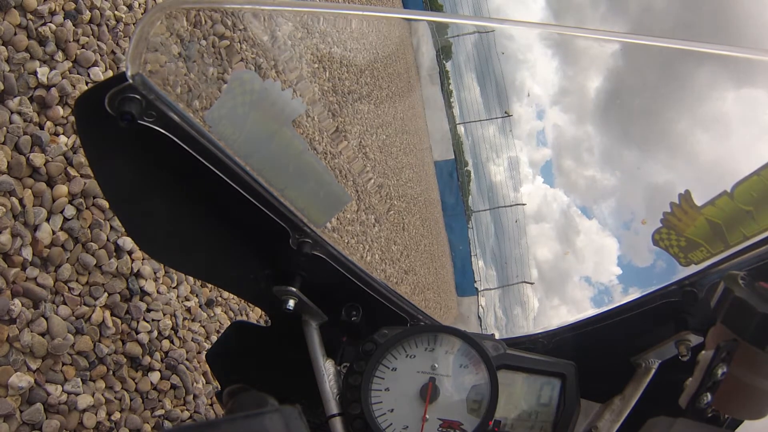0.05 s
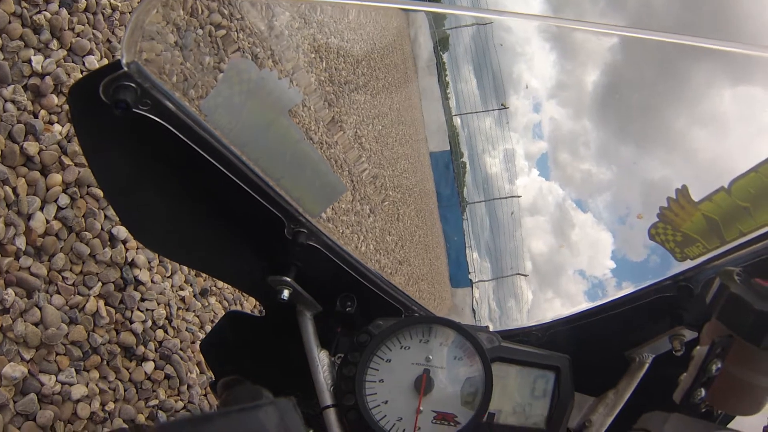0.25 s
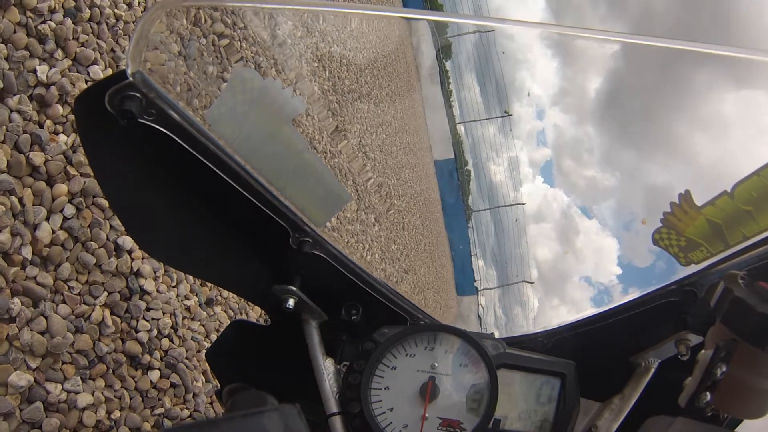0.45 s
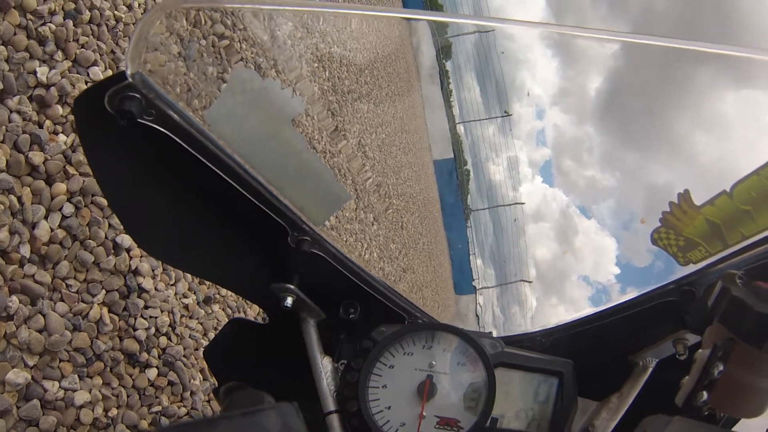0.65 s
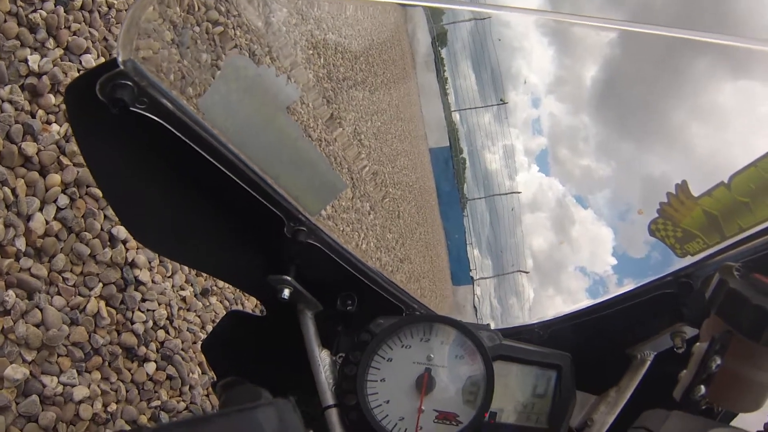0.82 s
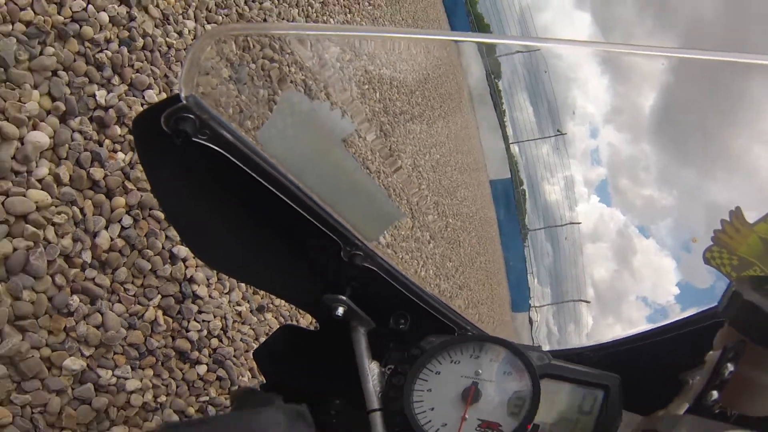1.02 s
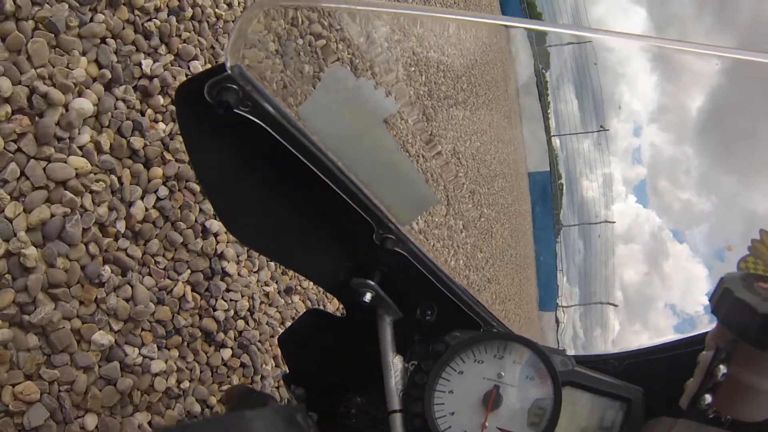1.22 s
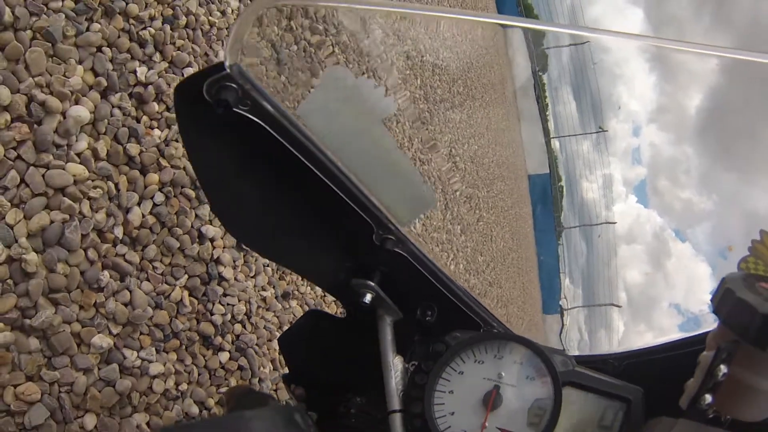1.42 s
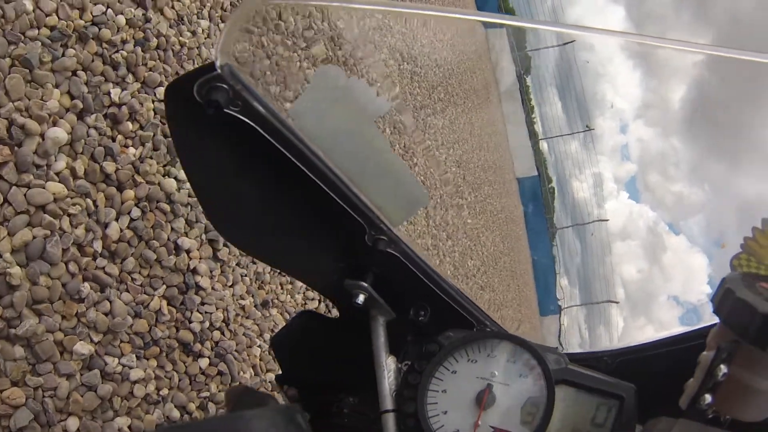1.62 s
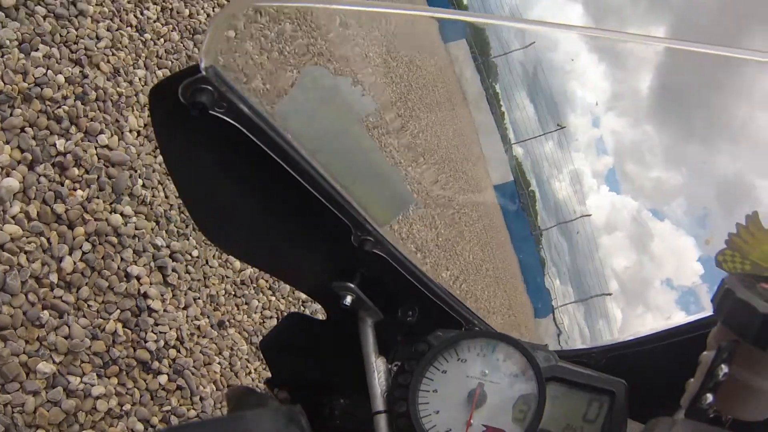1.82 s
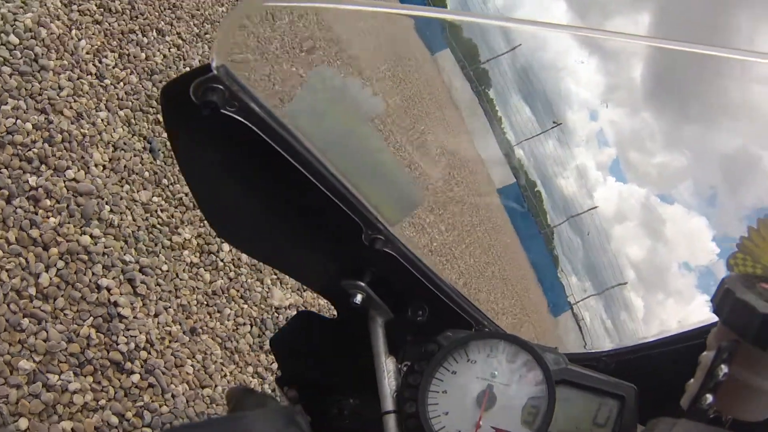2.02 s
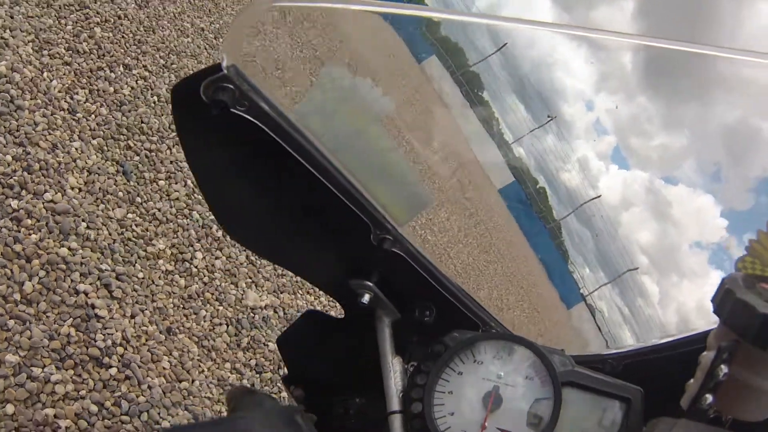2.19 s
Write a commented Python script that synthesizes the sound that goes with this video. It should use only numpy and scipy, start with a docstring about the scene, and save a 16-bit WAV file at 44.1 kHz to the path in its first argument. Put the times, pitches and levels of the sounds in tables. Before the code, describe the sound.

Heard up close from the bike itself, a toppled motorcycle's plastic bodywork scrapes twice over gravel, with dry knocks and heavy thumps. Afterwards loose stones tick and crunch softly above a low, wavering drone and faint outdoor wind.

```python
"""A fallen motorcycle is shifted on gravel, heard from on the bike, in a little wind. Two stones tick
faintly; at 0.2 s the plastic shell knocks, squeaks and scrapes as tiny slips make it ring, and the heavy
frame thumps and sways. From 0.6 s comes a second, broken scrape with more knocks and thumps. From about
1.25 s loose stones crunch and tick faintly over a low, wavering drone."""
import sys
import numpy as np
from scipy.fft import rfft, irfft, next_fast_len
from scipy.io import wavfile
from scipy.ndimage import map_coordinates

SR = 44100
rng = np.random.default_rng(int(sys.argv[2]) if len(sys.argv) > 2 else 0)


def dump(signal):
    """Clip the signal to [-1, 1] and save it as 16-bit WAV at the path in sys.argv[1]."""
    limited = np.clip(np.atleast_2d(signal).T, -1, 1)
    pcm = np.round(limited * 32767).astype(np.int16)
    wavfile.write(sys.argv[1], SR, pcm)


N = 103635
TIME = np.arange(N) / SR


def amp(db):
    """Turn decibels into a gain to multiply by."""
    return 10 ** (np.asarray(db) / 20)


def unit(x):
    """Scale a sound to an average power of 1."""
    return x / np.sqrt(np.mean(x ** 2) + 1e-20)


def along(points, hz):
    """Read the gain at hz off a colour: a table of how strong low and high pitches are."""
    freqs, db = np.transpose(points)
    return amp(np.interp(np.log(hz + 1), np.log(freqs + 1), db))


def level(rows, column=1):
    """Join a table's levels into a gain over time, silent before the first row."""
    rows = np.array(rows)
    return amp(np.interp(TIME, rows[:, 0], rows[:, column], left=-120))


def wobble(rate):
    """A smooth curve through rate random values a second."""
    return map_coordinates(rng.standard_normal(2048), [np.arange(N) * rate / SR], mode="wrap")


def coloured(x, gain):
    """Filter x by gain(hz), so that ringing follows each hit and never comes before it."""
    size = 2 * next_fast_len(len(x) + 4096)
    gains = np.maximum(gain(np.fft.rfftfreq(size, 1 / SR)), 1e-6)
    cepstrum = irfft(np.log(gains))
    cepstrum[1:size // 2] *= 2
    cepstrum[size // 2 + 1:] = 0
    return irfft(rfft(x, size) * np.exp(rfft(cepstrum)))[:len(x)]


def noise(colour):
    """Steady noise of the given colour."""
    return unit(coloured(rng.standard_normal(N), lambda hz: along(colour, hz)))


def add(track, start_s, sound):
    """Mix a sound into the track."""
    part = track[int(start_s * SR):][:len(sound)]
    part += sound[:len(part)]


def grit(rate, spread_db, hiss):
    """Tiny random slips of uneven size, about rate a second, over a hiss."""
    slips = (rng.random(N) < rate / SR) * np.sign(rng.standard_normal(N))
    sizes = amp(spread_db * np.clip(rng.standard_normal(N), -2, 2))
    return unit(unit(slips * sizes) + hiss * rng.standard_normal(N))


def contact(fade_s, rattle):
    """One sharp click, then tiny rattles that drop 60 dB in fade_s."""
    t = np.arange(4096) / SR
    burst = rng.standard_normal(len(t)) * amp(-60 * t / fade_s)
    burst *= rattle / np.linalg.norm(burst)
    burst[0] = 1
    return burst / np.linalg.norm(burst)


# pitches at which the plastic shell rings: f/Hz, width/Hz, level/dB
SHELL_RINGS = [(1374, 75, 11), (1574, 81, 3.5), (2140, 190, 3), (2890, 26, 11), (2956, 150, 12),
               (3520, 30, 11.5), (3762, 140, 10.5), (5320, 52, 0.5), (7040, 110, -0.5), (7960, 57, 3)]

def shell(hz, ring, modes=SHELL_RINGS):
    """The shell boosts sound near its own pitches; a larger ring boosts it more."""
    peaks = sum(amp(db) ** 2 / (1 + (2 * (hz - centre) / width) ** 2) for centre, width, db in modes)
    return np.sqrt(1 + peaks) ** ring


# colour of the wind: f/Hz, relative level/dB
WIND_COLOUR = [(25, 4), (75, -6.5), (120, -2.5), (600, -13.5), (3350, -27), (15000, -40.5)]

def air():
    """Faint wind and far rumble."""
    return amp(-62 + wobble(0.8)) * noise(WIND_COLOUR)


# loudness of the drone: t/s, throb level/dB, hum level/dB
DRONE_LEVELS = [(1.235, -36, -43), (1.33, -25.5, -35.5), (1.41, -36.5, -40.5), (1.49, -30, -66),
                (1.58, -40, -41.5), (1.73, -30, -50), (1.83, -34.5, -31), (1.91, -21.5, -36),
                (1.98, -35.5, -38.5), (2.05, -24.5, -48), (2.15, -37, -49.5), (2.3, -39.5, -36)]
# its higher tones: f/Hz, level/dB
DRONE_TONES = [(192, -67), (260, -58), (306, -60.5), (366, -61), (440, -64)]

def drone():
    """A wavering low throb and hum, with weak higher tones of steadier pitch."""
    def tone(hz, waver, flutter_db):
        pitch = hz * (1 + waver * wobble(12))
        return unit(np.sin(2 * np.pi * np.cumsum(pitch) / SR) * amp(flutter_db * wobble(21.73)))
    upper = sum(amp(db) * tone(hz, waver=0.00654, flutter_db=4.0) for hz, db in DRONE_TONES)
    throb = level(DRONE_LEVELS) * tone(hz=32.5, waver=0.067, flutter_db=-0.5)
    hum = level(DRONE_LEVELS, column=2) * tone(hz=119.3, waver=0.023, flutter_db=1.5)
    return throb + hum + upper * (TIME > DRONE_LEVELS[0][0])


# loudness of the crunch: t/s, relative level/dB
CRUNCH_LEVELS = [(1.25, -46), (1.45, -52.5), (1.54, -48.5), (1.6, -51), (1.635, -44), (1.665, -46),
                 (1.705, -46), (1.76, -48.5), (1.93, -49), (2.02, -54), (2.35, -54)]
# its colour: f/Hz, relative level/dB
CRUNCH_COLOUR = [(200, 12.5), (480, -5.5), (800, -6), (990, 1.5), (1170, -7.5), (1600, -4), (2450, -6.5),
                 (3000, -23), (3750, -16.5), (4250, -31), (4600, -19.5), (5150, -36), (6000, -22.5),
                 (9000, -49.5)]
# single stones: t/s, relative level/dB, f/Hz
STONE_TICKS = [(0.029, -41.5, 1340), (0.134, -37.5, 1610), (1.304, -28, 2500), (1.691, -23, 1400),
               (1.714, -24, 1390), (1.769, -38.5, 3500), (1.867, -33.5, 4100), (1.923, -27, 2270),
               (1.953, -28.5, 2360), (1.96, -35.5, 5250), (1.975, -23, 1830), (2.116, -25.5, 1480),
               (2.135, -34, 1040), (2.295, -34.5, 2400)]

def gravel():
    """Loose stones crunch in soft lumps; single ones tick, each around its own pitch."""
    slips = grit(rate=290, spread_db=1.0, hiss=1.0)
    crunch = unit(coloured(slips, lambda hz: along(CRUNCH_COLOUR, hz) * shell(hz, ring=0.33)))
    lumps = amp(4.5 + 2.6 * wobble(45.47))
    out = level(CRUNCH_LEVELS) * lumps * crunch
    for start, db, centre in STONE_TICKS:
        click = contact(fade_s=0.043, rattle=2.6)
        tick = coloured(click, lambda hz: (1 + 1.65 * np.log2((hz + 1) / centre) ** 2) ** -2)
        add(out, start, amp(db + 6.5) * tick / np.linalg.norm(tick))
    return out


# jolts of the frame: t/s, relative level/dB, f/Hz, fade time/s, relative ring level/dB
FRAME_THUMPS = [(.201, -14.5, 64, 0.087, -31), (0.223, -12.5, 39.6, 0.17, -20), (.631, -25.5, 25.7, 1, -45),
                (0.705, -16, 24.3, 0.36, -50), (0.823, -8, 76.8, 0.011, -34.5),
                (.961, -6.5, 56, 0.032, -32.5), (1.066, -12.5, 100, 0.089, -38.5),
                (1.144, -3.5, 33, 0.091, -31), (1.2151, 2.5, 124, 0.0093, -30.5)]
# hollow ring of the shell: f/Hz, relative level/dB, fade time/s
HOLLOW_RING = [(128, -2.5, 0.35), (189.4, -6, .24), (312, -16, 0.053)]
# loudness of the slow heaving: t/s, level/dB
HEAVE_LEVELS = [(.195, -45), (.21, -15.5), (.29, -21.5), (.48, -31), (.6, -35), (.9, -26.5), (1.08, -34),
                (1.14, -16), (1.23, -28.5), (1.3, -28.5), (1.45, -64), (1.75, -50), (1.9, -30.5),
                (2.0, -51), (2.35, -42.5)]
# its colour: f/Hz, relative level/dB
HEAVE_COLOUR = [(10, -2), (25, 12.5), (45, -6.5), (80, -8.5), (190, -24.5), (300, -32), (600, -47),
                (1500, -105)]

def frame():
    """The heavy frame thumps at each jolt, rings the hollow shell and heaves in between."""
    out, t = np.zeros(N), np.arange(SR // 2) / SR
    def fading_tone(hz, db, fade_s):
        return amp(db - 60 * t / fade_s) * np.sin(2 * np.pi * hz * t)
    ring = sum(fading_tone(*row) for row in HOLLOW_RING)
    onset = 1 - np.exp(-t / 0.00042)
    for start, db, hz, fade_s, ring_db in FRAME_THUMPS:
        thump = fading_tone(hz, db, fade_s) + amp(ring_db) * ring
        add(out, start, np.sqrt(2) * thump * onset)
    return out + level(HEAVE_LEVELS) * noise(HEAVE_COLOUR)


def squeak(peak_s=0.2245, width_s=0.0041, hz=1375, db=-13.5):
    """As the scrape takes hold, the shell briefly sticks and slips in step with its own ringing."""
    t = TIME - peak_s
    swell = amp(db) * np.exp(-(t / width_s) ** 2)
    return swell * np.sin(2 * np.pi * hz * t + 0.24 * wobble(500))


# loudness of the long drag, the later broken rub and the high crackle: t/s, level/dB
DRAG_LEVELS = [(.1995, -30), (.217, -35), (.228, -23), (.285, -27.5), (.35, -30.5), (.42, -26), (.49, -36),
               (.54, -44), (.60, -44), (.622, -55.5), (.66, -69)]
RUB_LEVELS = [(.645, -54.5), (.705, -62.5), (.73, -44.5), (.755, -40.5), (.80, -59), (.825, -44.5),
              (.896, -61.5), (.955, -55.5), (.968, -42), (1.085, -39.5), (1.132, -27), (1.152, -39),
              (1.19, -33), (1.252, -43), (1.263, -34), (1.305, -43), (1.38, -74)]
CRACKLE_LEVELS = [(.1995, -37.5), (.217, -43), (.23, -32.5), (.35, -43), (.46, -42.5), (.6, -64.5),
                  (.7, -91), (.75, -57), (.8, -82), (.83, -61), (.9, -91), (.97, -68), (1.08, -70.5),
                  (1.135, -35.5), (1.16, -51.5), (1.205, -49), (1.29, -64), (1.35, -86), (2.05, -70),
                  (2.35, -78)]
# their colours: f/Hz, relative level/dB
DRAG_COLOUR = [(250, -23), (650, -19.5), (1000, -7.5), (2090, -3.5), (2530, -8), (2900, -9), (4500, -17.5),
               (8000, -43)]
RUB_COLOUR = [(150, 1.5), (300, 1), (742, -3), (1360, 2.5), (2090, 2), (3280, -13), (3900, -9.5),
              (9000, -36.5)]
CRACKLE_COLOUR = [(2500, -38), (4800, 4.5), (9200, 2.5), (10000, -3.5), (10700, -1.5), (15500, -9)]

def scrapes():
    """Many tiny slips make the shell ring; sharper grit crackles on top."""
    def stroke(levels, colour, slips, ring):
        force = level(levels) * (TIME < levels[-1][0])
        flicker = amp(1.71 * wobble(130))
        ringing = coloured(slips, lambda hz: along(colour, hz) * shell(hz, ring))
        return force * flicker * unit(ringing)
    drag = stroke(DRAG_LEVELS, DRAG_COLOUR, grit(rate=1100, spread_db=0.5, hiss=0.6), ring=0.96)
    rub = stroke(RUB_LEVELS, RUB_COLOUR, grit(rate=3500, spread_db=3, hiss=0.63), ring=0.56)
    sharp_slips = grit(rate=2500, spread_db=3.5, hiss=0.99)
    return drag + rub + stroke(CRACKLE_LEVELS, CRACKLE_COLOUR, sharp_slips, ring=2.37)


# knocks: t/s, relative level/dB in four bands (body, crack, edge, fizz), fade time/s
SHELL_KNOCKS = [(.2, -21, -12, -33, -37, 0.013), (.629, -15, -22, -38.5, -42, 0.033),
                (0.7206, -18, -30, -19, -41, 0.0083), (0.8186, -10, -8, -18.5, -32, 0.01),
                (0.9617, -12.5, -16, -26.5, -31.5, 0.017), (1.04, -55, -41, -29.5, -51, 0.008),
                (1.0632, -23, -13, -42, -51, 0.017), (1.1409, -4.5, 0, -13.5, -26.5, 0.013),
                (1.2145, -24, -7.5, -25.5, -39, .012)]
# middles of those bands: f/Hz
KNOCK_BANDS = [550, 1800, 5000, 12000]
# pitches at which a struck panel rings: f/Hz, width/Hz, level/dB
PANEL_RINGS = [(970, 170, -3), (2086, 246, 8)]

def knocks(gap_s=0.000851, bounce_db=-6.5):
    """The shell cracks drily: each knock is a hit and two quick, fading bounces."""
    out = np.zeros(N)
    for start, *bands_db, fade_s in SHELL_KNOCKS:
        colour = [(60, bands_db[0] - 10)] + list(zip(KNOCK_BANDS, bands_db))
        chatter = contact(fade_s, rattle=3.8)
        for bounce in (1, 2):
            delay = bounce * gap_s * (1 + 0.086 * rng.standard_normal())
            add(chatter, delay, amp(bounce * bounce_db) * np.hanning(8) / 2)
        knock = coloured(chatter, lambda hz: along(colour, hz) * shell(hz, ring=1, modes=PANEL_RINGS))
        add(out, start, knock)
    return amp(14.5) * out


def scene():
    """Add all the sounds into one channel."""
    return (scrapes() + squeak() + knocks() + frame() + drone() + gravel() + air())[None]


def record(dry):
    """Cut away the very highest treble."""
    size, top_hz = next_fast_len(N + 8192), 15300
    hz = np.fft.rfftfreq(size, 1 / SR)
    return irfft(rfft(dry, size) / (1 + (hz / top_hz) ** 200), size)[:, :N]


dry = scene()
out = record(dry)
dump(out)
```